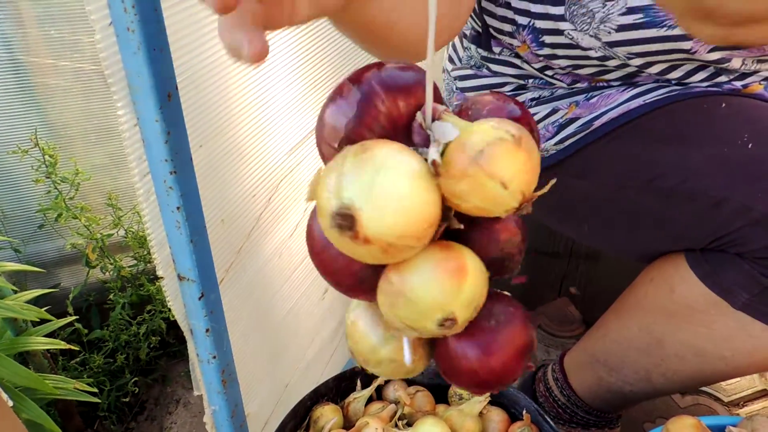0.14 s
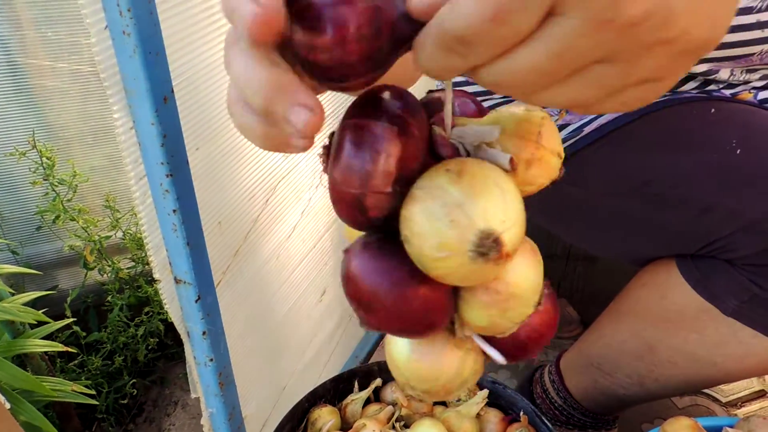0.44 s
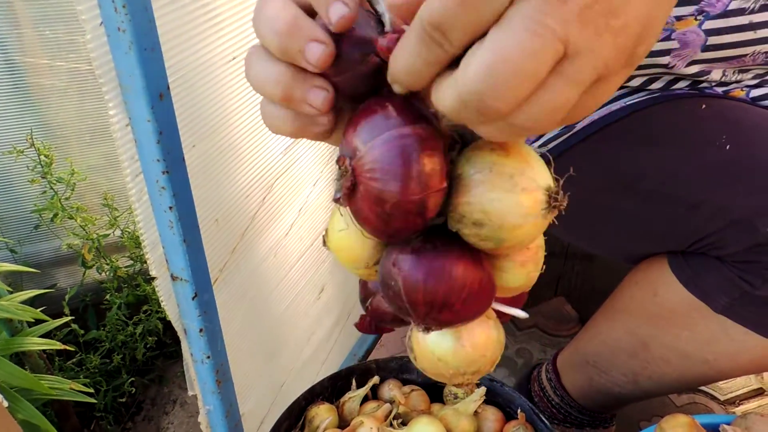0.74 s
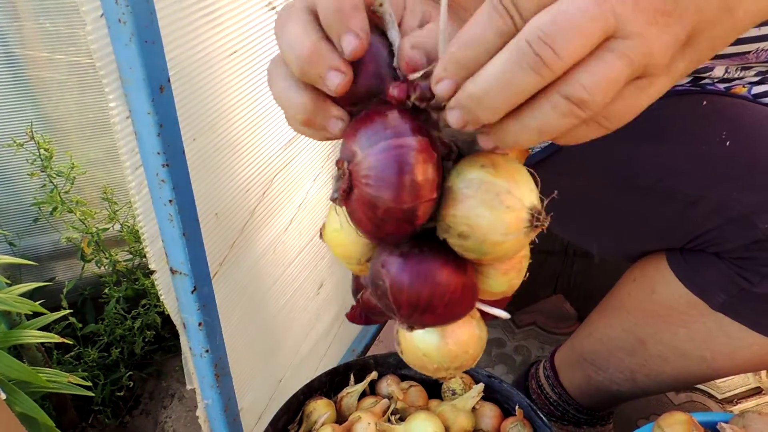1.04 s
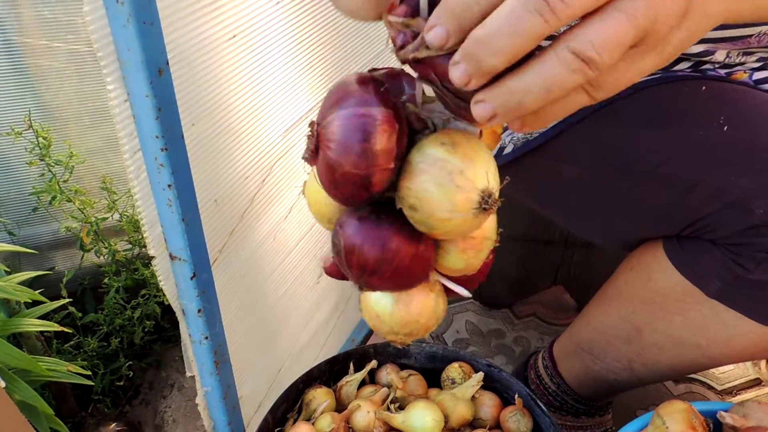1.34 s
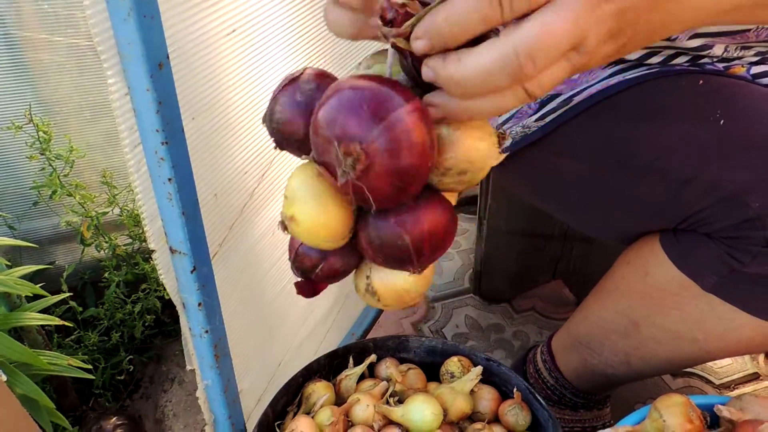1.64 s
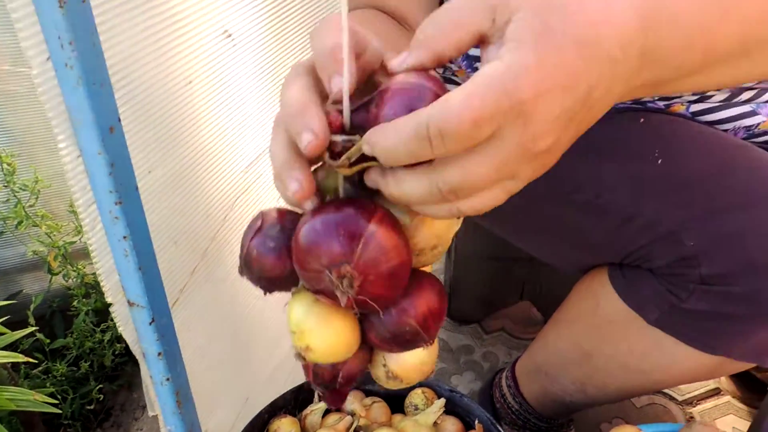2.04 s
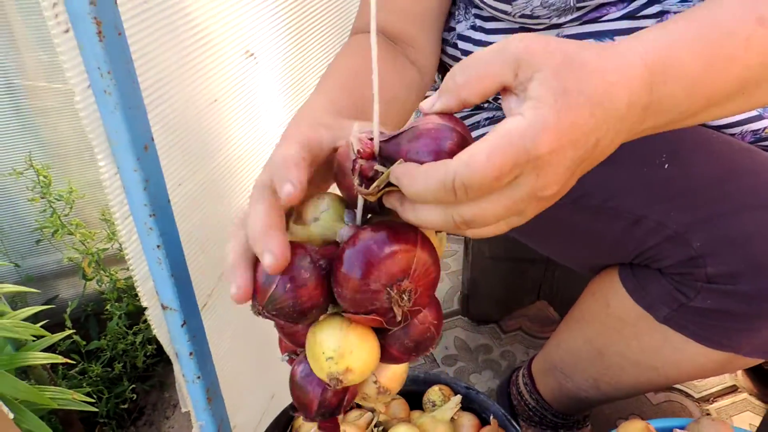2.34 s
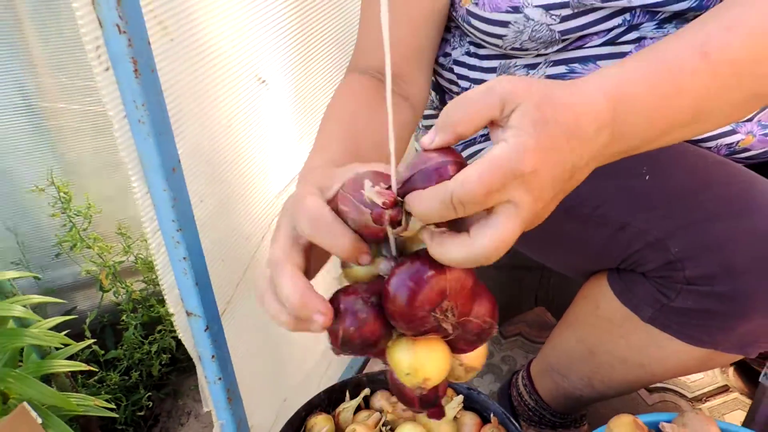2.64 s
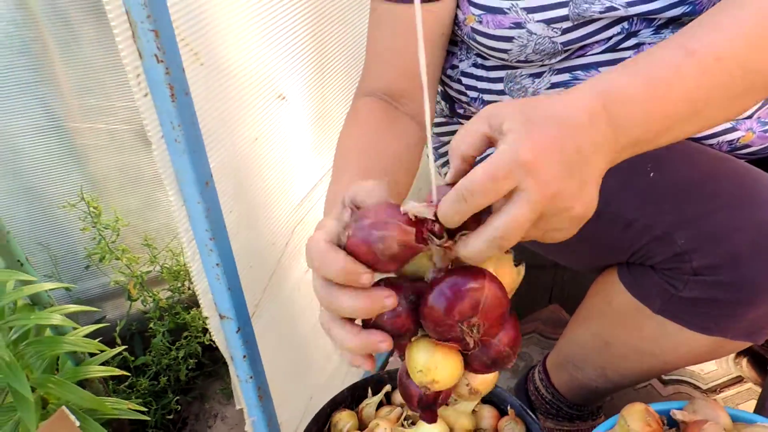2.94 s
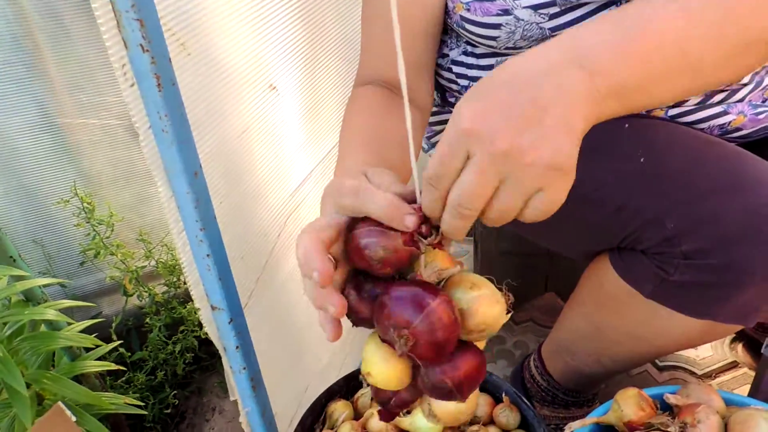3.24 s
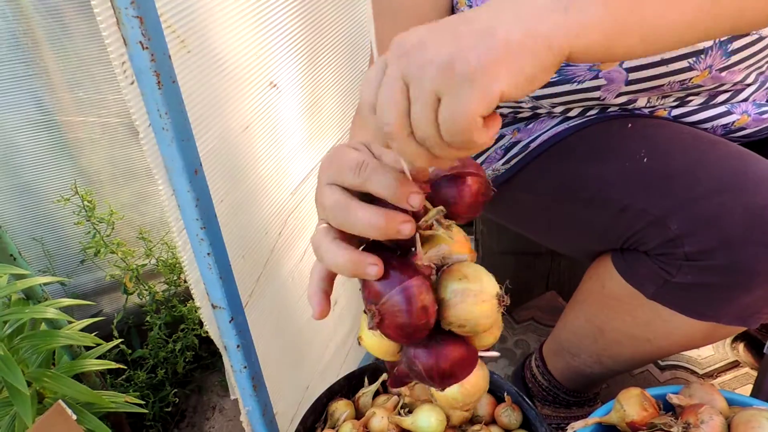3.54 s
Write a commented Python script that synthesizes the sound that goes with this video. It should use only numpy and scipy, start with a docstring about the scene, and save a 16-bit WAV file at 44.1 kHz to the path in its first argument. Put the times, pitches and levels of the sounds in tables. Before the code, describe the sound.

Outdoors, onions are twisted onto a hanging string: papery strokes, brittle ticks and a few dull bulb knocks, heard close with a short echo, over faint air hiss, low wind puffs and a far motor.

```python
"""A far motor hums under the hiss of open air, and soft puffs of air rumble on the microphone.
Close by, onions are plaited onto a hanging string: each twist drags dry tops over papery husks.
The rustle is a rush of tiny damped rings over sliding noise; single skins snap in short noise bursts.
Stiff flakes also ring, and now and then two bulbs knock together in a heavily damped thud.
The motor is two sine waves; air and rumble are coloured noise; a short echo follows the onions."""
import sys
import numpy as np
from scipy import signal
from scipy.fft import rfft, irfft, next_fast_len
from scipy.io import wavfile
from scipy.ndimage import uniform_filter1d, map_coordinates

SR = 44100
rng = np.random.default_rng(int(sys.argv[2]) if len(sys.argv) > 2 else 0)


def to_wav(s):
    """Save 16-bit WAV."""
    ch = np.atleast_2d(s).T  # columns
    pcm = np.round(np.clip(ch, -1, 1) * 32767)  # PCM
    wavfile.write(sys.argv[1], SR, pcm.astype(np.int16))


N = 163170  # length in samples


def amp(db):
    """Turn decibels into a gain."""
    return 10 ** (np.asarray(db) / 20)


def unit(x):
    """Scale to an average (rms) level of 1."""
    return x / np.sqrt(np.mean(x ** 2) + 1e-20)


def along(points, hz):
    """Read values between (frequency, value) points, spaced by pitch (log frequency)."""
    f, v = np.transpose(points)
    return np.interp(np.log(hz + 1), np.log(f + 1), v)


def clock():
    """Time of every sample, in seconds."""
    return np.arange(N) / SR


def level_over_time(points):
    """Gain of every sample, from (time [s], level [dB]) points joined by straight lines."""
    return amp(np.interp(clock(), *np.transpose(points)))


def wobble(rate):
    """A smooth random curve with rate random points a second."""
    knots = rng.standard_normal(int(N * rate / SR) + 4)
    return map_coordinates(knots, [clock() * rate])


def coloured(x, points):
    """Make each frequency louder or softer, following (frequency [Hz], level [dB]) points."""
    n = x.shape[-1]
    m = next_fast_len(n + n // 2)
    gain = amp(along(points, np.fft.rfftfreq(m, 1 / SR)))
    return irfft(rfft(x, m) * gain, m)[..., :n]


def stereo(mid, side, side_gain):
    """Left and right share mid; side pushes them apart."""
    return np.array([mid + side_gain * side, mid - side_gain * side])


def noise(points, side_db):
    """Steady coloured stereo noise of rms 1."""
    mid, side = coloured(rng.standard_normal((2, N)), points)
    return unit(stereo(mid, side, amp(side_db)))


def add(track, s, sound):
    """Mix a sound into the track, starting at s seconds."""
    start = max(round(s * SR), 0)
    part = track[:, start:][:, :sound.shape[-1]]
    part += sound[..., :part.shape[1]]


# Colour of the open air: (frequency [Hz], level [dB])
AIR_COLOUR = [(40, 10.5), (150, -0.5), (500, -3), (850, -2), (1300, -5), (2200, -11.5), (3600, -14),
              (10000, -17.5)]
# Loudness of the open air: (time [s], level [dB])
AIR_LEVEL = [(0, -50), (.4, -47), (1.1, -46), (1.55, -48), (2.2, -47.5), (3.7, -49)]


def open_air():
    """The outdoor hiss: wide coloured noise whose level drifts slowly."""
    return level_over_time(AIR_LEVEL) * noise(AIR_COLOUR, side_db=-5.5)


# Puffs of air on the microphone: (time of the peak [s], level [dB], half length [s])
PUFFS = [(0.101, -41, 0.046), (1.07, -33, 0.078), (1.452, -36.5, 0.049), (1.61, -47, 0.091)]
# Colour of the rumble, mostly deep bass: (frequency [Hz], level [dB])
RUMBLE_COLOUR = [(20, -3.5), (35, 5), (60, -3), (105, -1.5), (160, -10), (300, -29.5), (1000, -84)]
RUMBLE_DB = -59  # steady rumble under the puffs


def mic_rumble():
    """Air pushing on the microphone: bass noise that swells and fades smoothly with each puff."""
    t = clock()
    gain = amp(RUMBLE_DB)
    for s, db, half in PUFFS:
        gain = gain + amp(db) * np.exp(-((t - s) / half) ** 2)
    return gain * noise(RUMBLE_COLOUR, side_db=-3.0)


# Loudness of the far motor: (time [s], level [dB])
HUM_LEVEL = [(0, -35), (.33, -38.5), (.45, -32), (.8, -35.5), (1.5, -37.5), (1.66, -44), (1.85, -37),
             (2.1, -45), (2.35, -41.5), (2.6, -48), (2.82, -42.5), (3.05, -51), (3.7, -51)]
# The motor's note and its overtone: (multiple of the base pitch [-], level [dB])
HUM_ORDERS = [(1, -1.5), (2, -15.5)]
HUM_HZ, HUM_RISE_HZ_PER_S = 69.6, 0.449  # starting pitch, and how fast it creeps up


def hum():
    """A far motor: a low note with one weak overtone, creeping up in pitch."""
    # Adding up a changing pitch gives a smoothly running phase
    phase = 2 * np.pi * np.cumsum(HUM_HZ + HUM_RISE_HZ_PER_S * clock()) / SR
    tone = np.zeros(N)
    for multiple, db in HUM_ORDERS:
        tone += amp(db) * np.sin(multiple * phase + rng.uniform(0, 2 * np.pi))
    return np.sqrt(2) * tone * level_over_time(HUM_LEVEL)


# How long the echo takes to fall by 60 dB: (frequency [Hz], fall time [s])
YARD_FALL = [(200, 0.2), (2000, 0.11), (12000, 0.025)]
YARD_DB = -10  # echo against the direct sound


def yard(x):
    """A short answer from the nearby wall and ground: fading noise, its treble dying first."""
    hz, t, z = signal.stft(rng.standard_normal((2, SR // 4)), SR, nperseg=256)
    fade = amp(-60 * t / along(YARD_FALL, hz)[:, None])
    tail = signal.istft(z * fade, SR, nperseg=256)[1]
    return signal.fftconvolve(x, tail / np.linalg.norm(tail[0]), axes=1)[:, :N]


# Bulbs knocking together: (time [s], level [dB], pitch [Hz], contact time [s])
KNOCKS = [(0.9899, -19, 544, 0.00096), (1.8485, -25, 232, 0.00012), (2.428, -24, 895, 0.00061)]
KNOCK_CYCLES = 1.8  # swings in which the thud falls by 60 dB


def knocks():
    """Firm bulbs meet in one heavily damped thud; the longer the contact, the duller it is."""
    out, t = np.zeros((2, N)), np.arange(SR // 32) / SR
    for s, db, hz, contact in KNOCKS:
        thud = np.cos(2 * np.pi * hz * t) * amp(-60 * t * hz / KNOCK_CYCLES)
        push = np.sin(np.pi * np.minimum(t / contact, 1)) ** 2
        add(out, s, amp(db) * np.convolve(thud, push / push.sum()))
    return out


RAREST = .025  # share of fractures that reach the largest size


def fractures(rate, low_hz, high_hz, cycles, spread_db, scatter, count=30000, size=96):
    """Tiny damped rings at random moments, each with its own pitch, size and left-right phase."""
    draws = rng.random((count, 4))[:int(rate * N / SR)]
    when, pitch, strength, phase = draws.T[..., None]
    turn = scatter * rng.standard_normal((count, 1))[:len(when)]
    hz, k = low_hz + (high_hz - low_hz) * pitch, np.arange(size)
    size_db = -spread_db * np.log(np.maximum(strength, RAREST))  # a few are much larger
    fade = amp(size_db - 60 * k / SR * hz / cycles) * hz  # higher rings start louder
    at = ((when * N).astype(int) + k).ravel()
    ports = []
    for side in (-1, 1):
        ring = fade * np.sin(2 * np.pi * (hz * k / SR + phase) + side * turn)
        ports.append(np.bincount(at, ring.ravel(), N + size)[:N])
    return np.array(ports)


STRAY_DB = -59  # level of the loose skins


def strays():
    """Loose skins settle and tick faintly, also between the strokes."""
    ticks = fractures(rate=40, low_hz=2980, high_hz=13300, cycles=7.9, spread_db=2.0, scatter=1.0)
    return amp(STRAY_DB) * unit(ticks)


def burst(colour, t60):
    """A short stereo puff of noise that starts almost at once and falls 60 dB in t60 seconds."""
    t = np.arange(SR // 32) / SR
    fade = amp(-60 * t / t60)
    onset = 1 - np.exp(-t / .0001)
    mid, side = rng.standard_normal((2, len(t))) * fade * onset
    return unit(coloured(stereo(mid, side, .5), colour)) * np.sqrt(np.mean(fade ** 2))


# Colour of a snap, bright: (frequency [Hz], level [dB])
SNAP_COLOUR = [(500, -33), (2000, -22), (5000, -7.5), (9000, -3), (12500, 3), (15000, 3)]
SPLINTER_DB, SPLINTER_T60 = -15, .012  # splintering after a break: level against it, 60 dB fall [s]


def tick(t60):
    """One break: a bright noise burst with a softer spray of splinters in the husk colour."""
    return burst(SNAP_COLOUR, t60) + amp(SPLINTER_DB) * burst(HUSK_COLOUR, SPLINTER_T60)


# Thin skins tearing in a short crunch: (time [s], level [dB], time to fall by 60 dB [s])
SNAPS = [(0.694, -27, 0.015), (0.8505, -20.5, 0.0059), (0.9391, -22.5, 0.009), (0.9864, -16.5, 0.0031),
         (1.3263, -14, 0.0039), (1.334, -12.5, .004), (1.362, -26, .002), (1.8412, -18, 0.0036),
         (1.8843, -32, 0.0055), (1.9346, -18.5, .003), (2.013, -21, 0.0023), (2.1225, -14, 0.0079),
         (2.205, -17, .005), (2.2207, -12.5, 0.003), (2.229, -11, 0.0063), (2.5908, -20, 0.012),
         (2.7336, -20, 0.007), (2.808, -23, .004), (2.9095, -14.5, 0.0023), (2.932, -28, 0.0059),
         (2.9502, -15, .007), (2.9746, -16, 0.017), (3, -14, 0.039), (3.0285, -11, 0.006),
         (3.1012, -17, 0.011), (3.4665, -14.5, 0.0059), (3.6597, -24, 0.0087)]


def snaps():
    """Thin skins tear, each in a tick of its own length."""
    out = np.zeros((2, N))
    for s, db, t60 in SNAPS:
        add(out, s, amp(db) * tick(t60))
    return out


# Stiff flakes cracking: (time [s], tick level [dB], pitch [Hz], ring level over the tick [dB])
CRACKS = [(0.241, -42.5, 4570, 1), (0.5148, -25.5, 6730, -1), (.894, -26.5, 9500, 6),
          (1.0817, -15.5, 3540, -16), (1.1828, -24, 3830, -7), (1.4307, -16, 3800, -10),
          (1.6228, -12, 3700, -14), (1.7741, -17.5, 4100, -1.5), (1.914, -24.5, 3950, -1),
          (1.9497, -13, 5300, -18), (1.978, -6.5, 5100, -8), (2.559, -15.5, 9800, -1.5),
          (2.7615, -15, 13100, 8.5), (2.9202, -8.5, 5400, -14), (3.0594, -9.5, 6460, -6)]
CRACK_T60, FLAKE_CYCLES = .0018, 14  # 60 dB fall of the break [s], and of the ring [swings]


def cracks():
    """Stiff flakes break with a tick and ring for a moment at their own pitch."""
    out, t = np.zeros((2, N)), np.arange(SR // 32) / SR
    for s, db, hz, ring_db in CRACKS:
        ring = np.sin(2 * np.pi * hz * t) * amp(ring_db - 60 * t * hz / FLAKE_CYCLES)
        add(out, s, amp(db) * (tick(CRACK_T60) + ring))
    return out


def patchy(x, depth_db):
    """Each scrap of skin has its own colour: a random gain over pitch and time."""
    z = signal.stft(x, nperseg=256)[2]
    field = rng.standard_normal(z.shape[1:])
    field = uniform_filter1d(field, size=9, axis=0)  # smooth over pitch
    field = uniform_filter1d(field, size=7, axis=1)  # smooth over time
    return unit(signal.istft(z * amp(depth_db * unit(field)), nperseg=256)[1][:, :N])


# Twists and rubs of the dry tops:
# (time of the peak [s], level [dB], rise [s], fall [s], thick stalks against that level [dB])
STROKES = [(.405, -43, 0.011, 0.018, -18), (0.649, -37.5, 0.081, 0.024, -18),
           (0.699, -31.5, 0.035, 0.049, -10), (0.784, -34.5, 0.029, 0.039, -10),
           (.855, -37.5, 0.02, 0.019, -6), (.945, -40.5, 0.099, 0.068, -22),
           (1.002, -38.5, 0.069, 0.067, -5.5), (1.18, -48.5, 0.065, 0.019, -1.5),
           (1.322, -32.5, 0.11, 0.044, -9), (1.462, -38, 0.097, 0.078, -9.5),
           (1.628, -37, 0.036, 0.085, -9.5), (1.785, -36.5, 0.054, 0.097, -9.5),
           (1.89, -29, 0.01, 0.012, -11), (2.05, -36, 0.089, 0.18, -10), (2.127, -29, 0.02, 0.019, -14),
           (2.171, -33, .03, 0.01, -9.5), (2.216, -30, 0.012, 0.017, -5.5), (2.399, -47, 0.093, 0.12, -17),
           (2.59, -41, 0.091, 0.025, -12), (2.699, -30, 0.055, 0.068, -12.5), (3.002, -34, 0.091, 0.1, -26),
           (3.099, -35, 0.024, 0.019, -13), (3.18, -38, 0.07, 0.054, -9.5), (3.329, -37, 0.094, 0.1, -12.5),
           (3.477, -40, 0.052, 0.067, -13), (3.667, -43.5, 0.027, 0.2, -29)]
# Colour of the papery husks: (frequency [Hz], level [dB])
HUSK_COLOUR = [(500, -18), (2000, -22.5), (3500, -7), (5500, -3), (8000, -2.5), (10500, -0.5), (13000, 3.5),
               (15000, -5)]
# Colour of the thick stalks: (frequency [Hz], level [dB])
STALK_COLOUR = [(200, -26), (700, -12), (1500, 2), (2200, 2.5), (6000, 1), (12000, 0)]
STROKE_DROP_DB = 9  # fall in level over one rise or fall time
HUSK_DB, STALK_DB, SCRAPE_DB = -1, -2.5, -7  # fine fractures, coarse fractures, smooth sliding


def rustle():
    """Each stroke swells and lets go; husks and stalks break in clumps as they stick and slip."""
    t, fine, coarse = clock(), np.zeros(N), np.zeros(N)
    for s, db, rise, fall, body_db in STROKES:
        distance = np.abs((t - s) / np.where(t < s, rise, fall))
        power = amp(db - STROKE_DROP_DB * distance ** 1.57) ** 2
        fine += power
        coarse += power * amp(body_db) ** 2
    slip = amp(1.94 * wobble(60) + 1.54 * wobble(450))  # slow and fast flutter, in dB
    husk = fractures(rate=3000, low_hz=2660, high_hz=15550, cycles=10, spread_db=2.5, scatter=0.71)
    husk = patchy(coloured(husk, HUSK_COLOUR), depth_db=3.5)
    stalk = fractures(rate=2600, low_hz=695, high_hz=6600, cycles=2.5, spread_db=0.1, scatter=0.13)
    stalk = patchy(coloured(stalk, STALK_COLOUR), depth_db=2.5)
    scrape = noise(HUSK_COLOUR, side_db=-15.5)
    papery = np.sqrt(fine) * (amp(HUSK_DB) * husk + amp(SCRAPE_DB) * scrape)
    thick = np.sqrt(coarse) * amp(STALK_DB) * stalk
    return slip * (papery + thick)


LEAN_DB = 0.1  # onions: left raised and right lowered by this much


def scene():
    """The onions and their echo in front of the hum and the open air."""
    onions = rustle() + strays() + snaps() + cracks() + knocks()
    onions = onions * amp([[LEAN_DB], [-LEAN_DB]])
    return onions + amp(YARD_DB) * yard(onions) + hum() + open_air() + mic_rumble()


# Top edge of the sound: (frequency [Hz], level [dB])
TOP_EDGE = [(14200, 0), (14500, -20), (15500, -36)]
TOP_HZ = 15500  # nothing passes from here up


def record(dry):
    """Top edge of the sound: level falls steeply above 14.2 kHz, nothing above 15.5 kHz."""
    m = next_fast_len(N + SR // 2)
    spectrum = rfft(coloured(dry, TOP_EDGE), m)
    return irfft(spectrum * (np.fft.rfftfreq(m, 1 / SR) < TOP_HZ), m)[:, :N]


dry = scene()
out = record(dry)
to_wav(out)
```